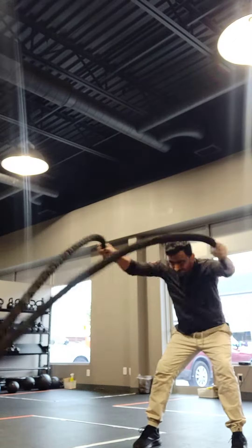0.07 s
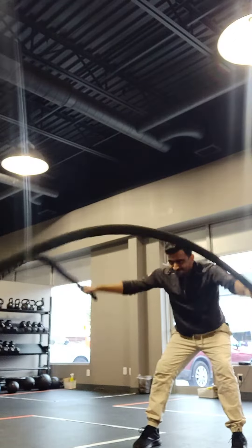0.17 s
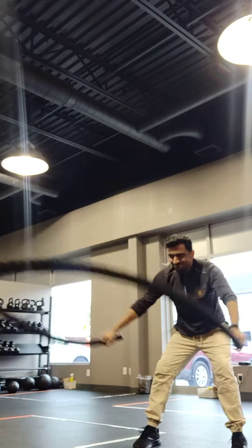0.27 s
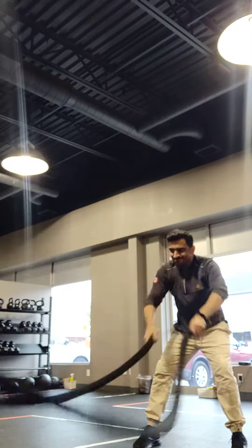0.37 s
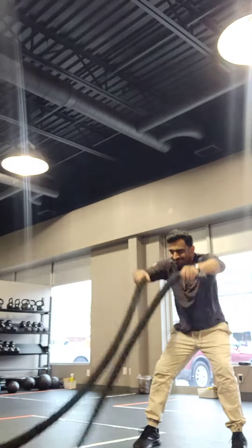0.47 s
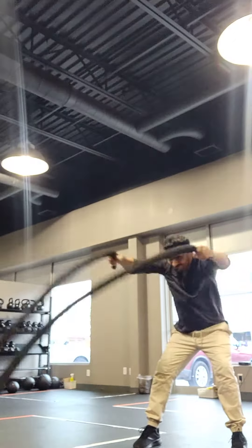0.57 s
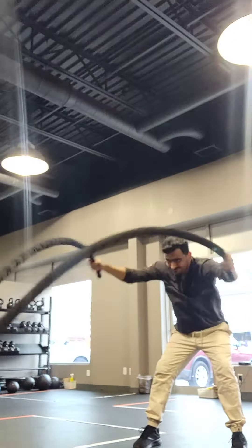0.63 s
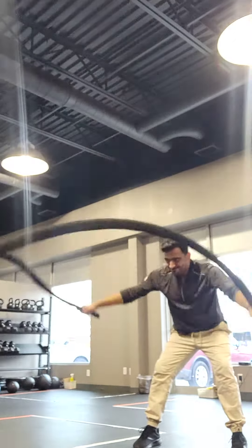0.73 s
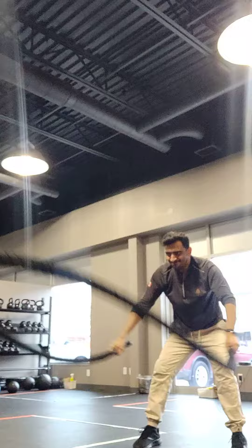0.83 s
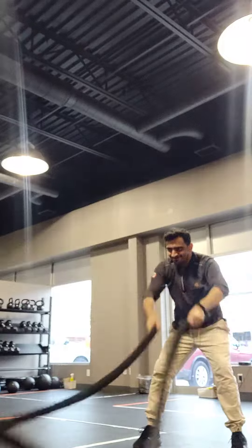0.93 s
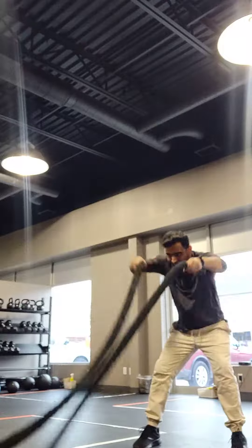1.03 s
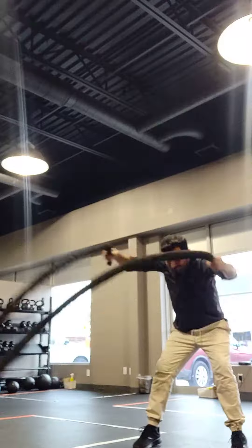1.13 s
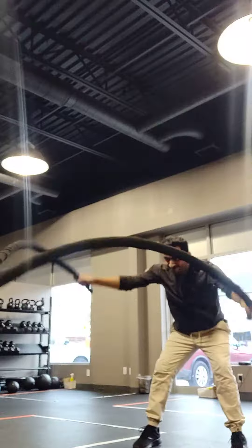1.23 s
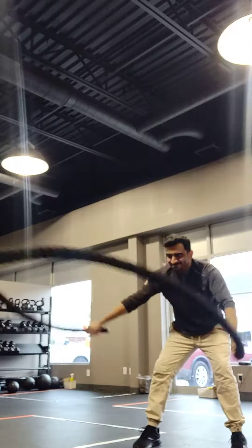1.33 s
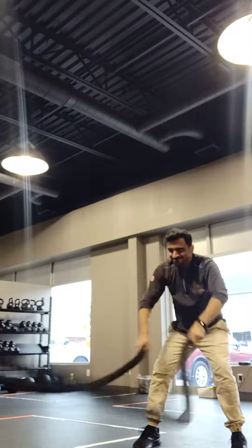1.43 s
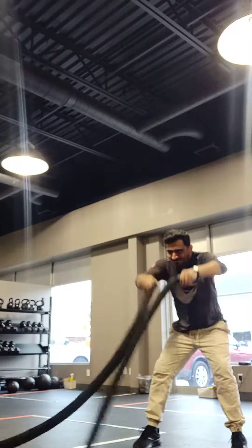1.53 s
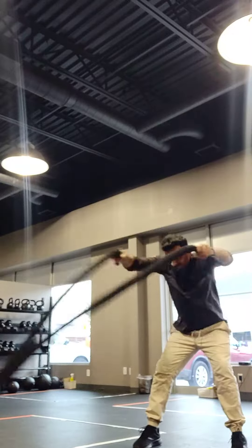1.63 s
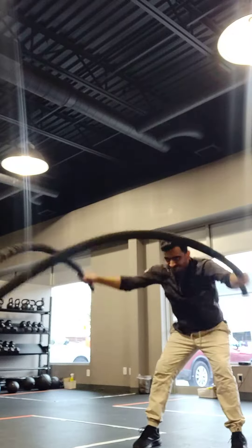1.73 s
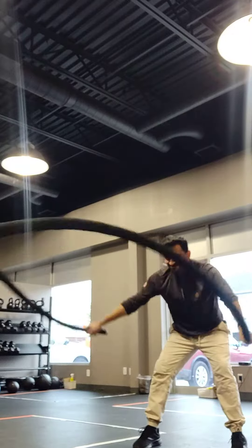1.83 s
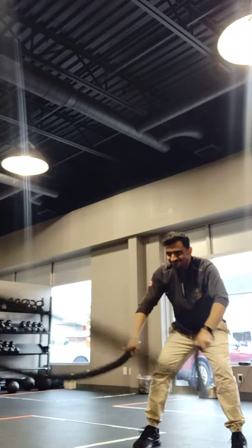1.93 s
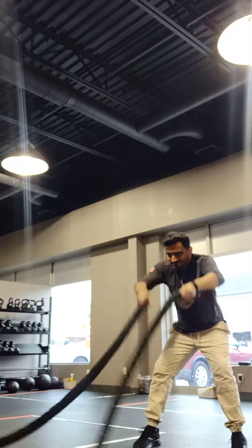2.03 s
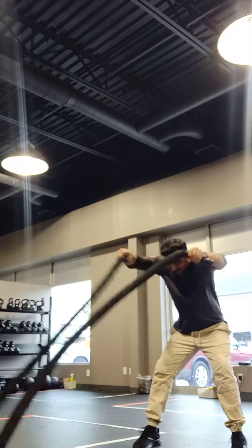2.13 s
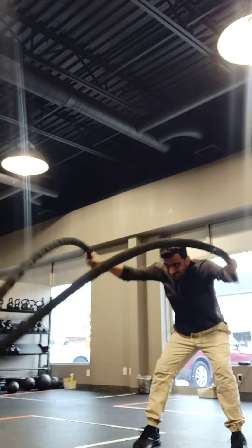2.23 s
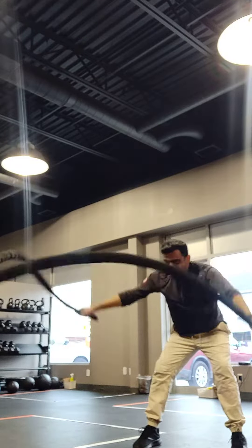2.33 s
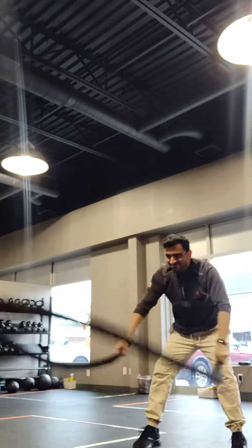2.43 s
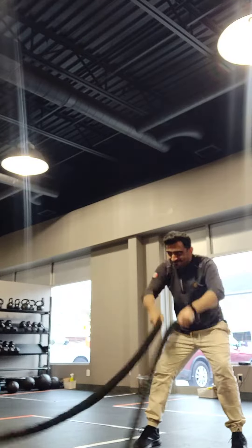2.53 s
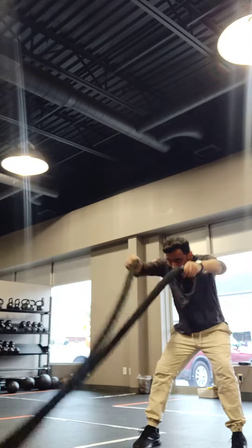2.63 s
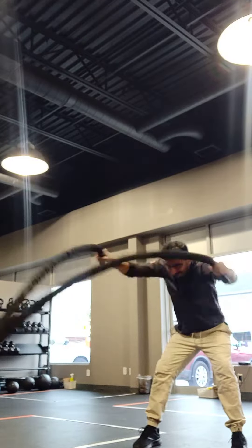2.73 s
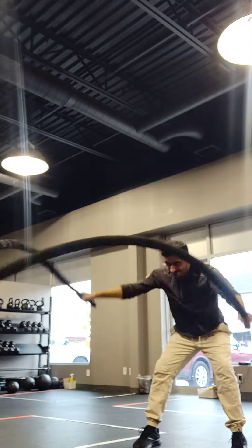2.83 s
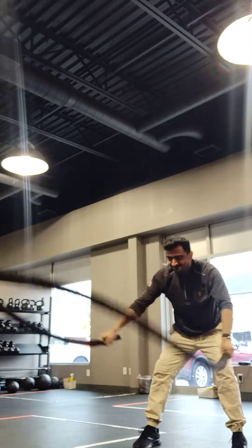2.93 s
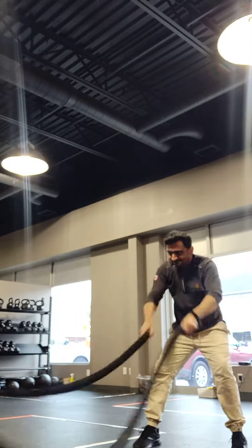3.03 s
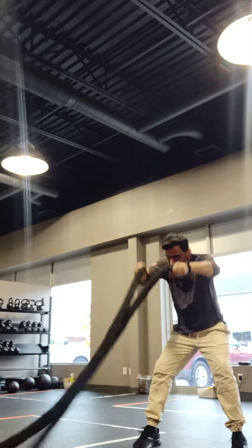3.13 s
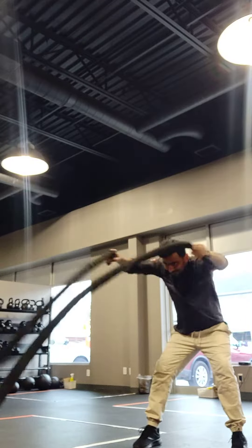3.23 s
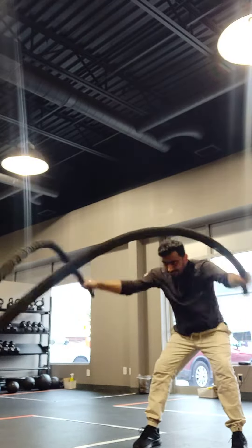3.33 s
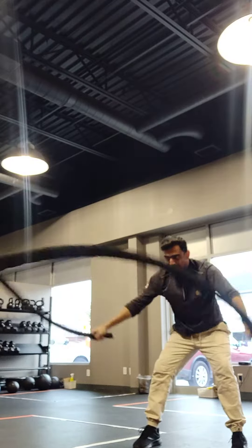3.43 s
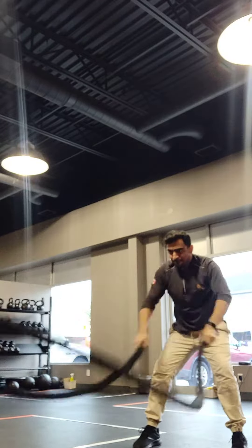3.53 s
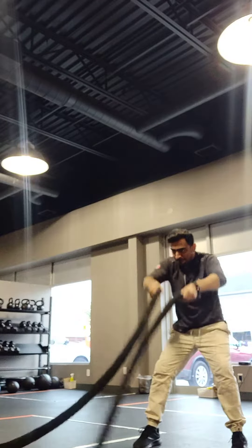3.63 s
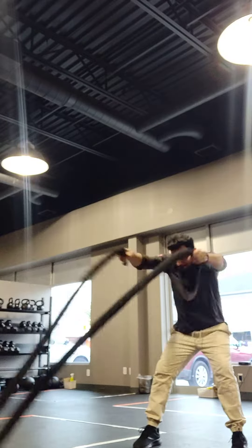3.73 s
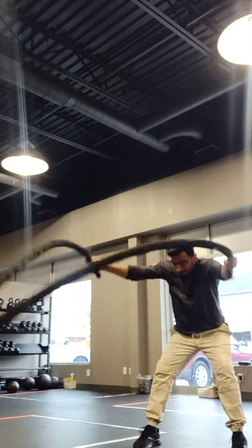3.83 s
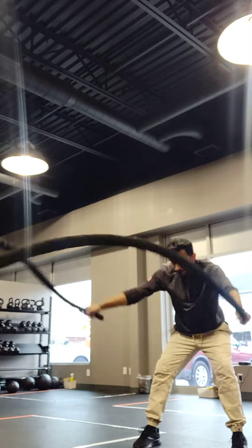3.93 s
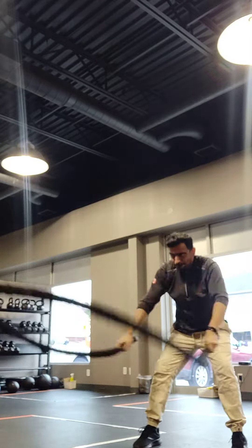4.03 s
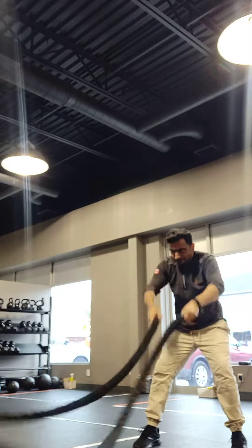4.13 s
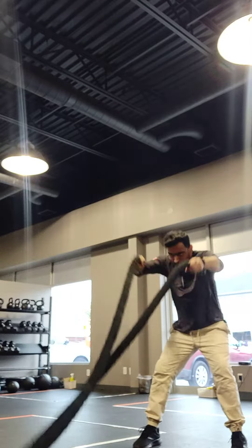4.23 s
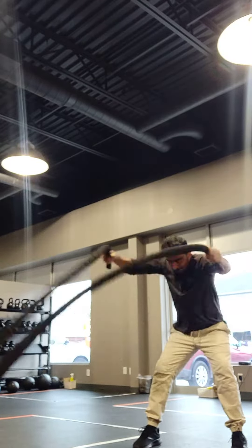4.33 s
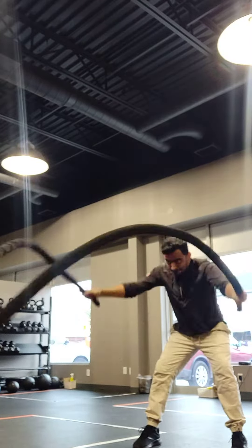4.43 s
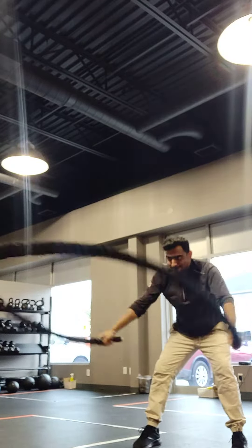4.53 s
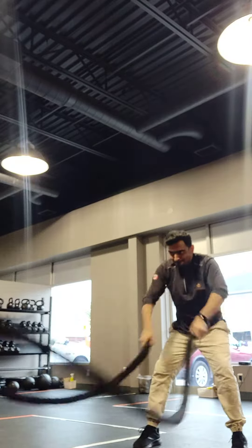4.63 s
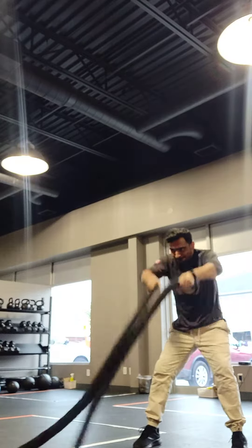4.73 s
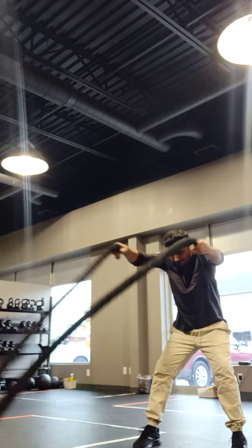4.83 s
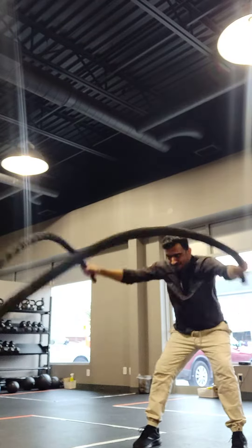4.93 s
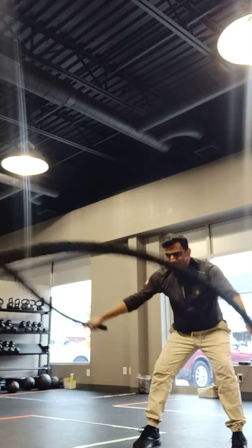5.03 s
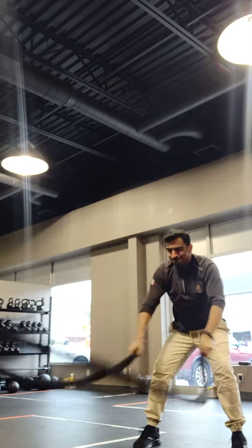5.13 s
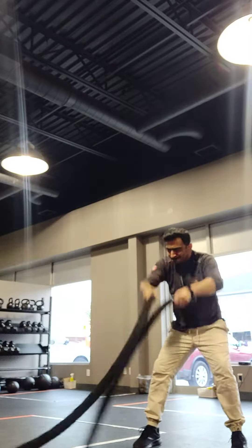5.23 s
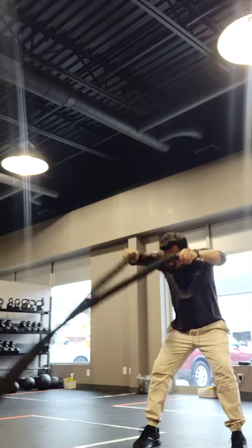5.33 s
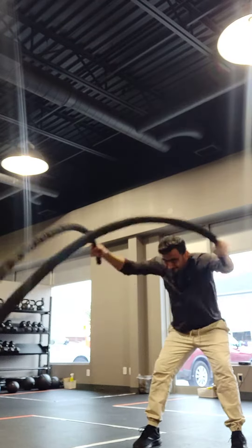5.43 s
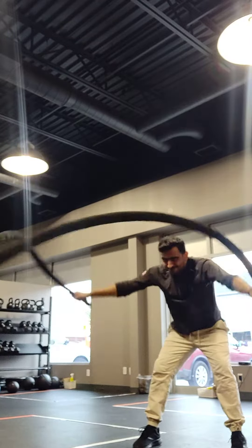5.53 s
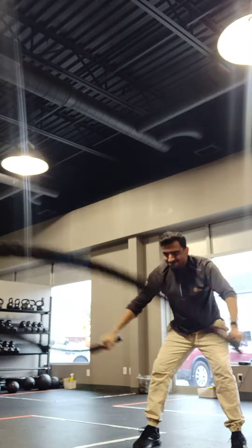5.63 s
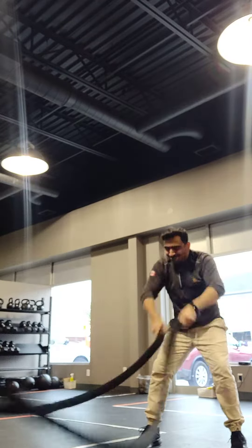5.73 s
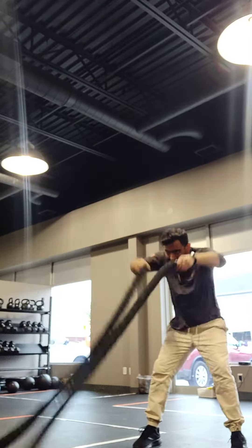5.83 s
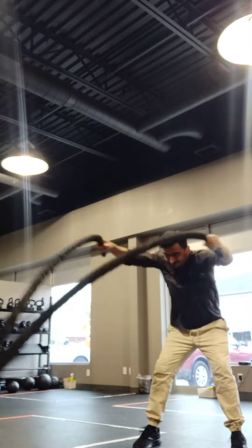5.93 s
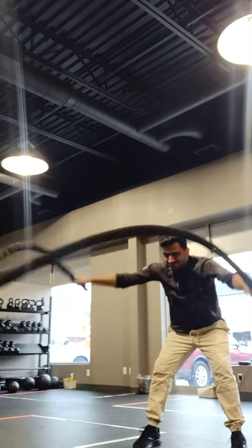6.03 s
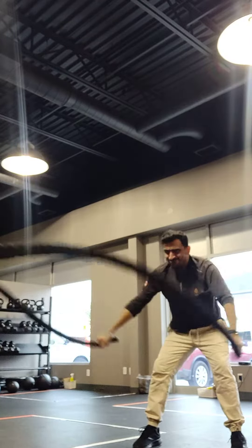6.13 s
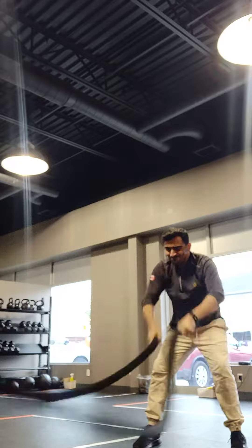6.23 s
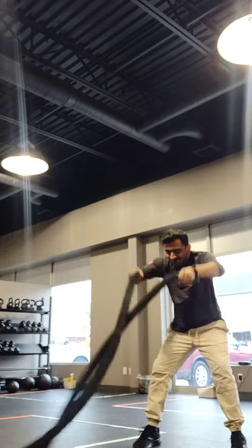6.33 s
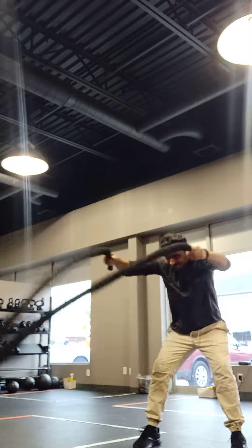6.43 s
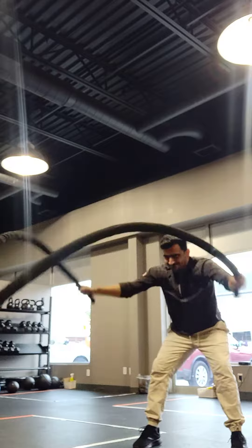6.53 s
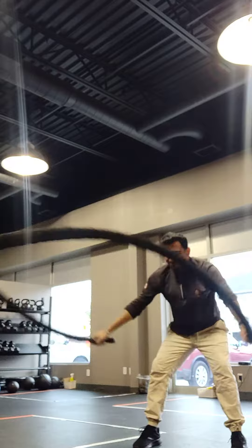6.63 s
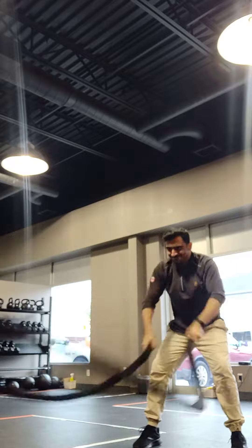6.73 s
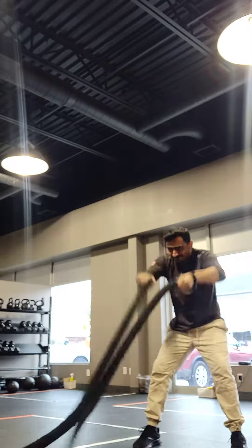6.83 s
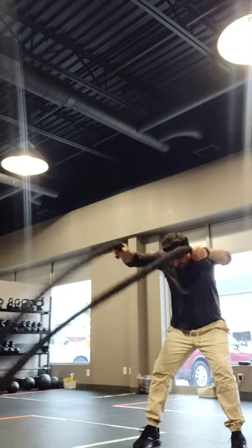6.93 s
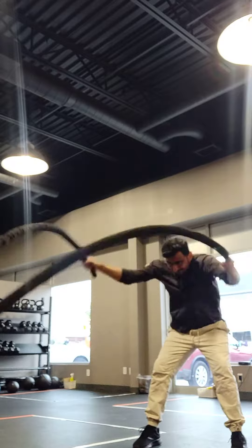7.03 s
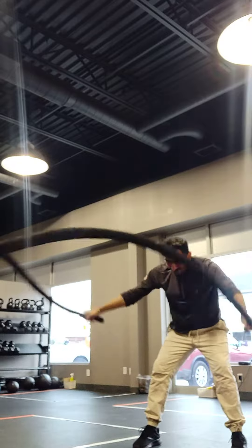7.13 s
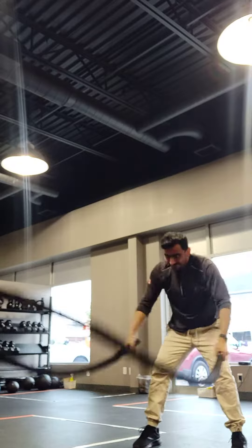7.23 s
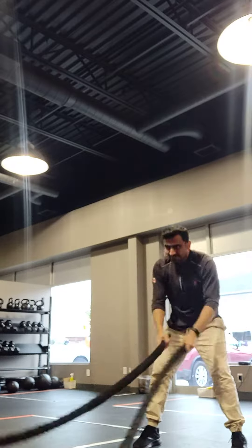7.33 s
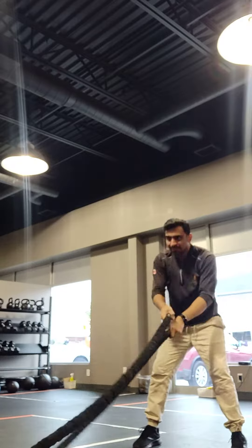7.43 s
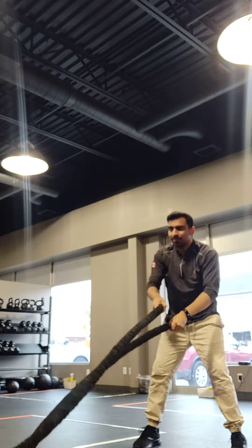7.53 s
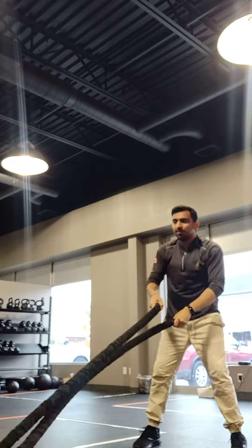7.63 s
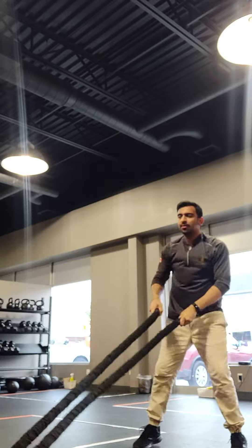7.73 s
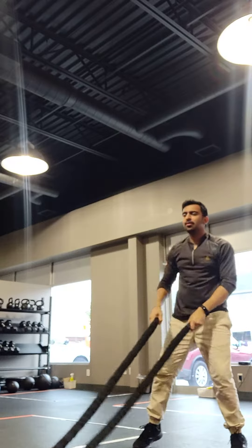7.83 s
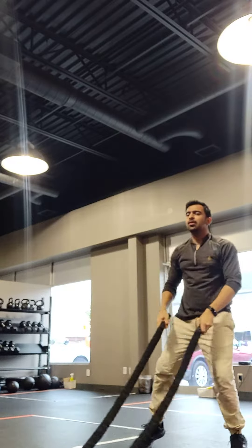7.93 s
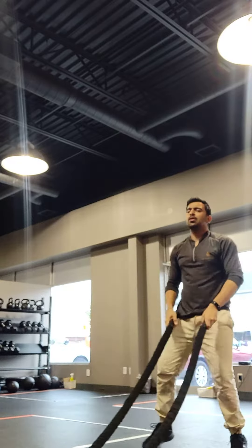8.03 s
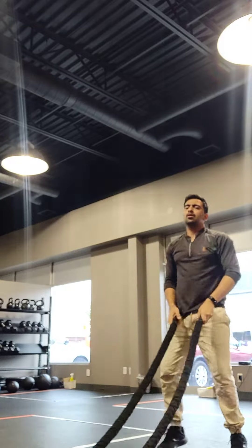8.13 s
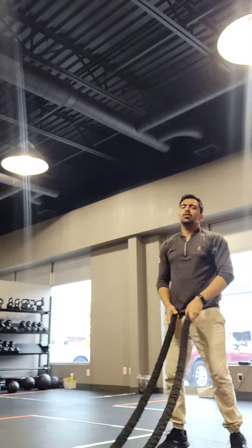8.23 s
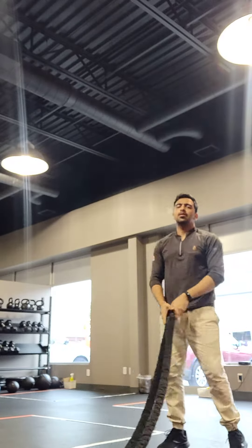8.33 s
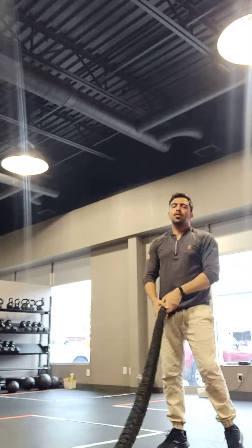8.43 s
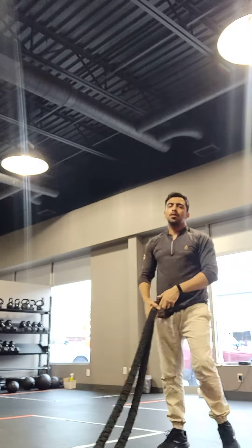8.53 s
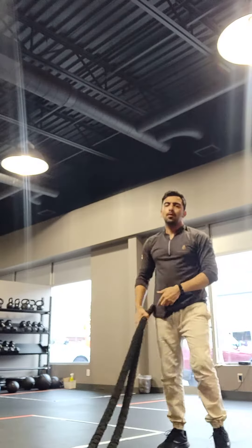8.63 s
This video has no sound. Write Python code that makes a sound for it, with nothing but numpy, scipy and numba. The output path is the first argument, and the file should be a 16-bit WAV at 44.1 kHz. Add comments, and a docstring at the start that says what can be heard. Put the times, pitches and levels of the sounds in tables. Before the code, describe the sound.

Steady hard whacks of thick ropes on matting, with rushing fibre swishes between them in an echoing gym, ending in soft slack flops.

```python
"""The ring of a large hall is heard first, dying away over ventilation; then two heavy ropes strike a rubber floor.
About twice a second damped modes and bursts of contact noise make a slap or two, one for each rope.
A wave then runs off along the floor: dense random grains hiss, rasp and rumble as fibres and core are laid down.
Grips creak, one near blow jolts the phone, the hall rings between strokes, and at the end slack loops settle.
A limiter holds the peaks down."""
import sys
import numpy as np
from scipy import signal
from scipy.fft import rfft, irfft, next_fast_len
from scipy.io import wavfile
from scipy.ndimage import uniform_filter1d, minimum_filter1d, map_coordinates
from numba import njit

SR = 44100
rng = np.random.default_rng(int(sys.argv[2]) if len(sys.argv) > 2 else 0)


def dump_mix(stems):
    """Bounce the given channels to the path in sys.argv[1] as a 16-bit WAV at rate SR."""
    frames = np.atleast_2d(stems).T  # one column per channel
    limited = np.clip(frames, -1, 1)  # hard clip at full scale
    pcm = np.round(limited * 32767).astype(np.int16)
    wavfile.write(sys.argv[1], SR, pcm)


N = 382347
TIME = np.arange(N) / SR

# All levels in the tables are relative; each layer adds its own level.
# Swings of both ropes. Each row: start in seconds, lag of the second rope in seconds, slap in dB,
# time the loop takes to smack down in seconds, run time of the wave in seconds, hiss of the fibres in dB,
# rasp of the braid in dB, weight of the core on the floor in dB.
STROKES = [(.042, 0.024, -8, 0.046, .195, -11, -26.5, -31),
           (.619, .006, 3.5, 0.017, 0.19, -11, -18.5, -25.5), (1.147, 0.019, -1, 0.03, .19, -14, -28, -18),
           (1.688, 0.037, -4, 0.029, 0.18, -14, -21.5, -29.5),
           (2.209, .016, 2, 0.03, 0.17, -10.5, -19.5, -21), (2.731, 0.018, -3, 0.022, 0.16, -11, -17, -42),
           (3.259, .029, 0, .004, 0.26, -20.5, -21.5, -18.5),
           (3.786, 0.018, -12, 0.025, 0.16, -13, -24.5, -57),
           (4.369, 0.0019, 6.5, 0.0061, .215, -18.5, -22, -34),
           (4.877, .015, -1, .022, 0.17, -12.5, -26, -29.5),
           (5.409, 0.0087, 0, 0.0098, 0.22, -12.5, -18, -20),
           (5.943, 0.005, -1.5, 0.019, .16, -11, -19.5, -52),
           (6.472, .011, 3, 0.018, 0.2, -15.5, -20, -22.5),
           (6.984, 0.0034, 0.5, 0.015, .17, -11, -17.5, -32),
           (7.513, 0.0025, 1, 0.012, .19, -14, -17.5, -29)]
# Ropes chafing and creaking at the grips. Each row: time in seconds, level in dB, centre in Hz.
GRIP_SCUFFS = [(0.468, -16, 6260), (2.053, -21.5, 4860), (2.609, -24.5, 4930), (3.133, -15, 8400),
               (4.35, -23, 6300), (4.828, -29, 6500), (5.878, -27, 6300), (6.923, -20, 4000)]
# Slack loops flopping down as the swinging stops. Each row: time in seconds, tap in dB, slump in dB.
SLACK_LOOPS = [(7.865, -7, -28.5), (8.019, -16, -59), (8.547, -44, -37.5)]
# Damped modes of rope on matting. Each row: nominal frequency in Hz, level in dB, T60 in seconds.
MAT_MODES = [(285, -16, 0.061), (375, -8, 0.021), (492, -7, 0.0071), (718, -6, 0.02), (1180, -9, 0.049)]
# Reverberation time of the hall. Each row: frequency in Hz, T60 in seconds.
HALL_T60 = [(150, 1.28), (700, 1.64), (2500, 1.77), (6000, 1.02), (14000, 0.44)]

# Spectrum of the ventilation. Each row: frequency in Hz, level in dB.
VENT_SPECTRUM = [(25, -70), (60, -22), (110, 3.5), (180, 1.5), (270, 3.5), (420, -13), (1000, -11.5),
                 (3000, -24), (7000, -20.5), (15000, -33)]
# Spectrum of the ring of the hall. Each row: frequency in Hz, level in dB.
HALL_SPECTRUM = [(60, -32), (220, 5), (500, -3), (850, -5.5), (1500, -2), (3000, -1), (6500, 2),
                 (9000, -3.5), (15000, -11.5)]
# Spectrum of distant rope contact. Each row: frequency in Hz, level in dB.
FAR_SPECTRUM = [(70, -22.5), (200, 1.5), (330, -2), (750, -6), (1400, 1.5), (2500, -1.5), (4000, -3.5),
                (6500, -9), (9000, -16), (15000, -11)]
# Spectrum of a loop slumping onto the mat. Each row: frequency in Hz, level in dB.
SLUMP_SPECTRUM = [(40, -42), (100, 0), (210, 11.5), (330, -2), (700, -16), (3000, -22)]
# Spectrum of the fibres rushing down. Each row: frequency in Hz, level in dB.
HISS_SPECTRUM = [(500, -32), (2000, 0), (4000, 0.5), (6500, 0.5), (9000, -0.5), (15000, 2)]
# Spectrum of the braid scraping. Each row: frequency in Hz, level in dB.
RASP_SPECTRUM = [(300, -36), (800, 1.5), (1400, 1), (2100, 3), (3100, 5.5), (4500, 3.5), (8000, -11),
                 (15000, -30)]
# Spectrum of the core rolling down. Each row: frequency in Hz, level in dB.
RUMBLE_SPECTRUM = [(50, -32), (120, -12), (230, -4.5), (380, 3.5), (650, -3), (1100, -10), (2500, -7),
                   (8000, -88)]
# Spectrum of the last swish of a run. Each row: frequency in Hz, level in dB.
SWISH_SPECTRUM = [(500, -38), (1500, -27), (2200, 3.5), (3000, 3.5), (3700, 3), (4500, -3.5), (8000, -13),
                  (15000, -43)]
# Spectrum of the crack of a blow. Each row: frequency in Hz, level in dB.
CRACK_SPECTRUM = [(100, -20), (400, -6.5), (900, 2), (1900, 5), (3000, 2), (3700, -3), (6500, -5),
                  (15000, 3)]
# Spectrum of the very near snap. Each row: frequency in Hz, level in dB.
SNAP_SPECTRUM = [(1000, -17), (6000, 1), (9000, 14), (12500, 29), (15500, 34)]
# Radiation of the floor under a blow, weak in the bass. Each row: frequency in Hz, gain in dB.
FLOOR_RADIATION = [(30, -38), (60, -29), (100, -12.5), (200, -8), (350, 1), (2000, -3.5)]
# Response of the microphone. Each row: frequency in Hz, gain in dB.
MIC_RESPONSE = [(30, -7), (4800, 2.5), (5800, 7), (6600, 8), (7200, 0.5), (7900, -11), (10000, -19.5),
                (13000, -28), (15800, -36)]
# A brief dip in level. The row: start in seconds, end in seconds.
DIP_S = (.474, .612)


def amp(db):
    """A level in decibels is twenty times the logarithm of an amplitude ratio."""
    return 10 ** (np.asarray(db) / 20)


def unit(x):
    """Dividing by the root mean square leaves a signal of unit power."""
    return x / np.sqrt(np.mean(x ** 2))


def read(points, hz):
    """Interpolation on a logarithmic frequency axis gives a table's value at hz."""
    f, value = np.transpose(points)
    return np.interp(np.log(np.maximum(hz, 1)), np.log(f), value)


def convolve(x, response):
    """A linear system's output is its input convolved with its impulse response."""
    return signal.fftconvolve(x, response)[:N]


def colour(x, points, size=4096):
    """Folding the cepstrum onto positive times gives the causal minimum-phase filter of a spectrum."""
    cepstrum = irfft(np.log(amp(read(points, np.fft.rfftfreq(size, 1 / SR)))))
    cepstrum[1:size // 2] *= 2
    cepstrum[size // 2 + 1:] = 0
    return convolve(x, irfft(np.exp(rfft(cepstrum))))


def grains(points, per_s, spread_db):
    """Friction as shot noise: a dense random stream of tiny contacts of uneven size, rms 1."""
    size = amp(spread_db * np.minimum(rng.exponential(size=N), 4))
    occurs = rng.random(N) < per_s / SR
    return unit(colour(occurs * size * rng.standard_normal(N), points))


def fade(age, t60):
    """Exponential decay: silent before age 0, then down by 60 dB after t60 seconds."""
    return (age >= 0) * np.exp(-np.log(1000) * np.maximum(age, 0) / t60)


def near(s):
    """An event acts locally in time: the samples round it, and their age in seconds."""
    span = slice(max(int((s - .1) * SR), 0), int((s + 1) * SR))
    return span, TIME[span] - s


def contact(age, rise_s, end_s, fall_s):
    """Share of the rope coming down: it grows after the slap and ends as the wave is spent."""
    growth = np.clip(age / rise_s, 0, 1)
    return growth * .5 * (1 - np.tanh((age - end_s) / fall_s))


def flutter(per_s, depth_db):
    """Random amplitude modulation: the uneven gain of coils that come down in clumps."""
    knots = rng.standard_normal(2000)
    return amp(depth_db * np.interp(TIME * per_s, np.arange(len(knots)), knots))


def ventilation(db=-41):
    """Broadband flow noise: steady random pressure with a fixed spectrum."""
    return amp(db) * unit(colour(rng.standard_normal(N), VENT_SPECTRUM))


def earlier_stroke(db=-23):
    """Exponential reverberant decay: the hall still rings from the stroke before."""
    return amp(db) * fade(TIME, HALL_T60[1][1]) * grains(FAR_SPECTRUM, 20000, 1.3)


def hall(x, wet_db=-6, first_s=0.016):
    """Diffuse-field energy balance: each half-octave stores what it is fed and lets it die, the treble first."""
    size, lowest_hz = next_fast_len(N), 88
    hz = np.fft.rfftfreq(size, 1 / SR)
    half_octaves = 2 * np.log2(np.clip(hz, lowest_hz, 16000) / lowest_hz)
    source = rfft(x, size)
    noise = rfft(rng.standard_normal(N), size)
    out = 0
    for k in range(16):
        window = np.cos(np.pi / 2 * np.clip(half_octaves - k, -1, 1))
        band = irfft(source * window, size)[:N]
        field = irfft(noise * window, size)[:N]
        t60 = read(HALL_T60, lowest_hz * 2 ** (k / 2))
        keep = np.exp(-2 * np.log(1000) / (t60 * SR))  # energy kept per sample
        energy = signal.lfilter([1 - keep], [1, -keep], band ** 2)
        delayed = np.interp(TIME - first_s, TIME, energy, left=0)
        out = out + np.sqrt(delayed) * unit(field)
    return amp(wet_db) * colour(out, HALL_SPECTRUM)


def scuffs(width_hz=3800, grit_db=-8, length_s=0.014):
    """Stick-slip friction of rope on rope: short gritty bursts of band-limited noise."""
    out = np.zeros(N)
    for s, db, hz in GRIP_SCUFFS:
        span, age = near(s)
        slip = rng.standard_normal(len(age))
        edges = [hz - width_hz / 2, hz + width_hz / 2]
        band = signal.butter(2, edges, "band", fs=SR, output="sos")
        creak = unit(signal.sosfilt(band, slip)) + amp(grit_db) * slip
        out[span] += amp(db) * np.exp(-(2 * age / length_s) ** 2) * creak
    return out


def settling(lead_s=0.039, rise_s=.03, hold_s=0.17, fall_s=0.097, rustle_db=-3):
    """Distributed contact: each slack loop slumps with a low rumble and a rustle, then slides to rest."""
    sliding = np.zeros(N)
    for s, tap, slump in SLACK_LOOPS:
        sliding += amp(slump) * contact(TIME - s + lead_s, rise_s, hold_s, fall_s)
    rustle = amp(rustle_db) * grains(FAR_SPECTRUM, 1500, 2.0) * flutter(50, 3.6)
    return sliding * (grains(SLUMP_SPECTRUM, 500, 2.2) + rustle)


def jolt(s=3.2868, db=-1, hz=70, t60=0.016, snap_db=13, snap_t60=.022, crack_db=-3, crack_t60=.025):
    """Impulse response of a damped mode: a near blow shakes the phone, with a short crack and very bright snap."""
    age = TIME - s
    shake = -amp(db) * fade(age, t60) * np.sin(2 * np.pi * hz * age)
    snap = amp(snap_db) * fade(age, snap_t60) * grains(SNAP_SPECTRUM, 20000, 2.0)
    crack = amp(crack_db) * fade(age, crack_t60) * grains(CRACK_SPECTRUM, 20000, 1.4)
    return shake + snap + crack


def floor_bounce(x, share=0.18, start_s=0.00101, end_s=0.000322, glide_s=0.055):
    """Comb interference: the detour off the floor shrinks as the contact recedes, so the comb sweeps upward."""
    starts = np.array(STROKES)[:, 0]
    stroke = np.maximum(np.searchsorted(starts, TIME) - 1, 0)
    age = np.maximum(TIME - starts[stroke], 0)
    # the rope never lands twice in the same place
    place = 1 + 0.13 * rng.standard_normal(len(starts))
    lag = place[stroke] * (end_s + (start_s - end_s) * np.exp(-age / glide_s))
    bounce = map_coordinates(x, [(TIME - lag) * SR], order=3)
    return (x + share * bounce) / np.sqrt(1 + share ** 2)


def waves(hiss_db=-2, rasp_db=-2.0, rumble_db=-2.5, rumble_runs=1.15, far_db=-21.5,
          swish_db=1, swish_rise_s=0.081, swish_fall_s=0.02):
    """Travelling contact: as it runs off, hiss goes first, then rasp and rumble; a duller swish swells and stops."""
    hiss, rasp, rumble, far, swish = np.zeros((5, N))
    for s, lag, slap, smack, run, fibre_db, braid_db, weight_db in STROKES:
        span, age = near(s + max(lag, smack))  # once both ropes are down
        hiss[span] += amp(fibre_db) * contact(age, 0.032, 0.72 * run, 0.027)
        rasp[span] += amp(braid_db) * contact(age, 0.021, 0.76 * run, 0.037)
        rumble[span] += amp(weight_db) * contact(age, 0.061, rumble_runs * run, 0.24)
        swish[span] += amp(braid_db) * contact(age - run / 2, swish_rise_s, run / 2, swish_fall_s)
        far[span] += contact(age, 0.31, 0.43, 0.21)
    fibres = amp(hiss_db) * hiss * grains(HISS_SPECTRUM, 16000, 0.93)
    braid = amp(rasp_db) * rasp * grains(RASP_SPECTRUM, 9000, 3.1)
    core = amp(rumble_db) * rumble * grains(RUMBLE_SPECTRUM, 2500, 2.0) * flutter(45, 2.4)
    distant = amp(far_db) * far * grains(FAR_SPECTRUM, 12000, 1.8)
    run_end = amp(swish_db) * swish * grains(SWISH_SPECTRUM, 9000, 1.3) * flutter(60, 3)
    close = floor_bounce(fibres + braid) * flutter(70, 1.0)
    return close + core + (distant + run_end) * flutter(35, 1.0)


def landings(second_thump_db=-5, thump_per_db=0.84, second_crack_db=-7, tap_crack_db=-6):
    """Successive impacts as (s, thump dB, crack dB, hold s): first rope, second rope, and taps of slack loops."""
    usual_weight = np.mean(np.array(STROKES)[:, -1])
    blows = [(s, tap, tap + tap_crack_db, 0) for s, tap, slump in SLACK_LOOPS]
    for s, lag, slap, smack, run, hiss, rasp, weight in STROKES:
        # the first rope cracks fully and smacks on while its loop comes down
        blows.append((s, slap, 0, smack))
        # the second follows and thumps with its weight
        second_thump = second_thump_db + thump_per_db * (weight - usual_weight)
        blows.append((s + lag, second_thump, second_crack_db, 0))
    return blows


def slaps(thump_db=-2, crack_db=-1, crack_t60=0.077, hold_db=-4.5, snap_db=-3, snap_t60=0.023,
          brush_db=-16, brush_s=0.0097, lowest_hz=85):
    """Impact excitation: fibres brush the mat, then the core lands with a held crack and damped modal thump."""
    thumps, force = np.zeros(N), np.zeros(N)
    for s, low_db, high_db, hold in landings():
        span, age = near(s)
        detune = 1 + 0.1 * rng.standard_normal(len(MAT_MODES))
        for (hz, db, ring), d in zip(MAT_MODES, detune):
            thumps[span] += amp(low_db + db) * fade(age, ring) * np.sin(2 * np.pi * hz * d * age)
        brush = amp(brush_db) * np.exp(-((age + brush_s) / brush_s) ** 2)
        held = amp(hold_db) * (age >= 0) * fade(np.maximum(age - hold, 0), crack_t60)
        crack = np.maximum(fade(age, crack_t60), held)
        snap = amp(snap_db) * fade(age, snap_t60)
        force[span] += amp(high_db) * (crack + snap + brush)
    cracks = amp(crack_db) * force * grains(CRACK_SPECTRUM, 20000, 1.4)
    # so small a patch of floor radiates little bass
    blows = colour(amp(thump_db) * thumps + cracks, FLOOR_RADIATION)
    return signal.sosfilt(signal.butter(1, lowest_hz, "high", fs=SR, output="sos"), blows)


def scene(dip_db=-5):
    """Superposition: ropes, hall and ventilation add, the same in both channels."""
    ropes = slaps() + waves() + scuffs() + settling()
    # the level dips briefly before the second stroke
    inside = 1. * ((TIME > DIP_S[0]) & (TIME < DIP_S[1]))
    dip = amp(dip_db * uniform_filter1d(inside, size=400))
    mono = dip * (ropes + hall(ropes) + earlier_stroke() + jolt() + ventilation())
    return np.array([mono, mono])


@njit
def hold_peaks(x, release):
    """Peak detection: the envelope jumps to each peak and sinks slowly."""
    y, e = np.empty(len(x)), 0.
    for i in range(len(x)):
        e = max(abs(x[i]), e * release)
        y[i] = e
    return y


def record(dry, ceiling=0.4, release_s=0.011, peak=1.0, top_hz=15800):
    """Transduction and gain control: a microphone with a treble peak and steep fall above it, then a limiter."""
    x = colour(dry[0], MIC_RESPONSE)
    loudness = np.sqrt(np.abs(uniform_filter1d(x ** 2, size=130)))
    envelope = hold_peaks(loudness, np.exp(-1 / (release_s * SR)))
    gain = 1 / np.maximum(envelope / ceiling, 1)
    # the shifted window holds the gain down just after each slap
    x = x * minimum_filter1d(gain, size=601, origin=300)
    # a faster stage rounds off the tips that remain
    tips = 1 / np.maximum(np.abs(x) / min(peak, 1), 1)
    x = x * uniform_filter1d(minimum_filter1d(tips, size=15), size=15)
    x = signal.sosfilt(signal.ellip(12, .2, 95, top_hz, fs=SR, output="sos"), x)
    return np.array([x, x])


dry = scene()
out = record(dry)
dump_mix(out)
```